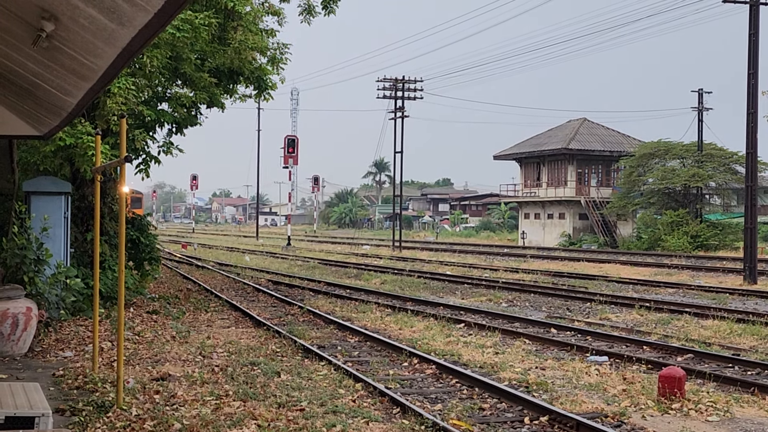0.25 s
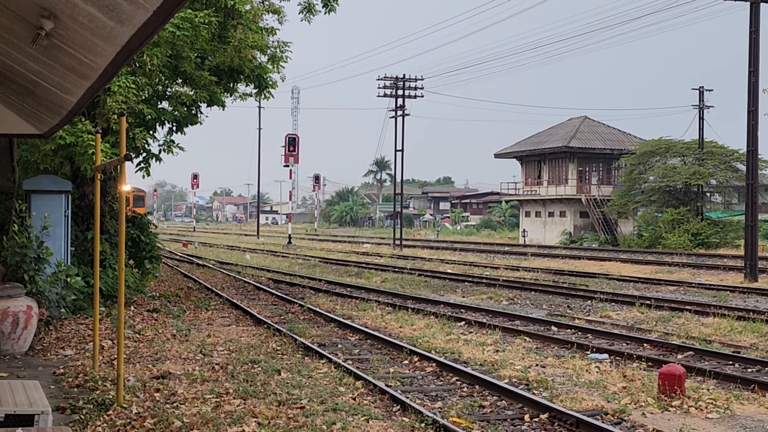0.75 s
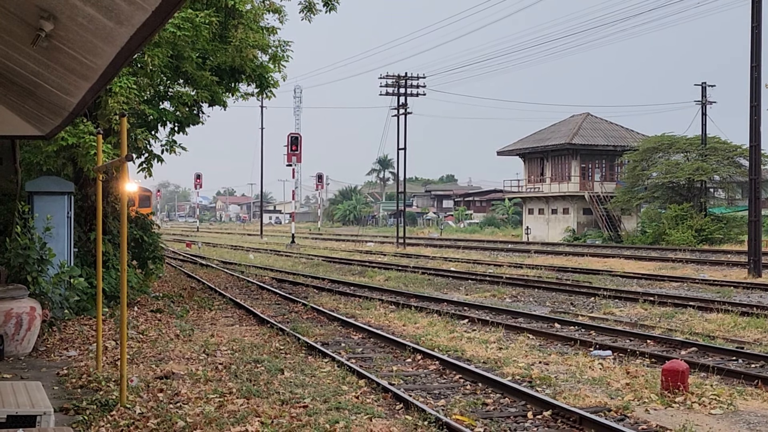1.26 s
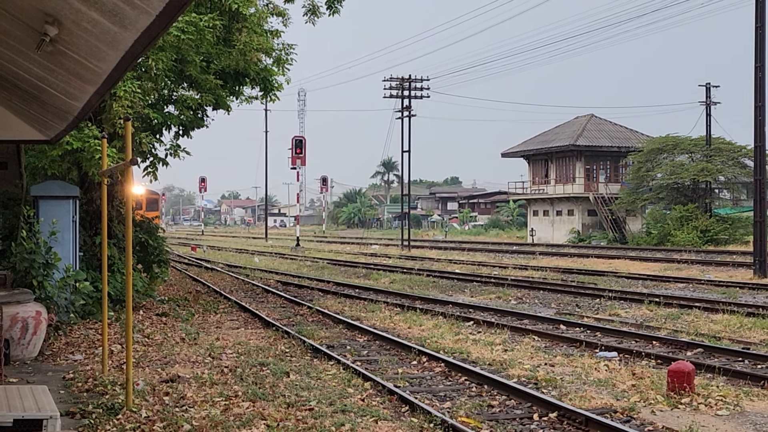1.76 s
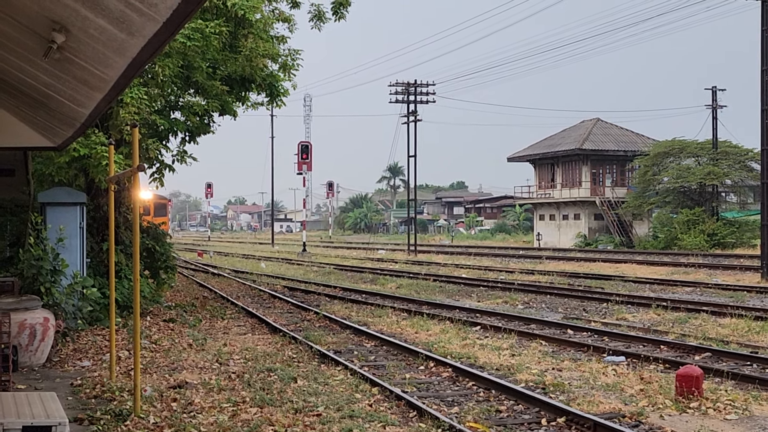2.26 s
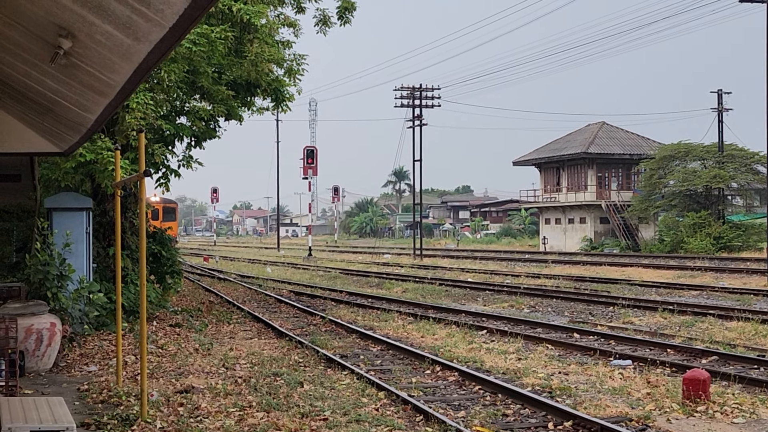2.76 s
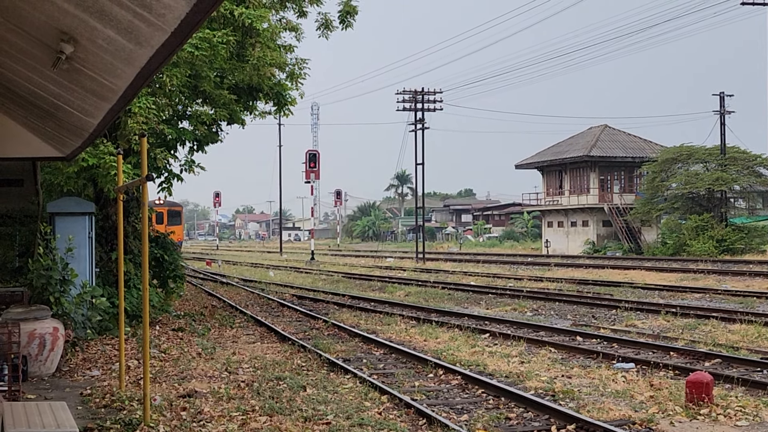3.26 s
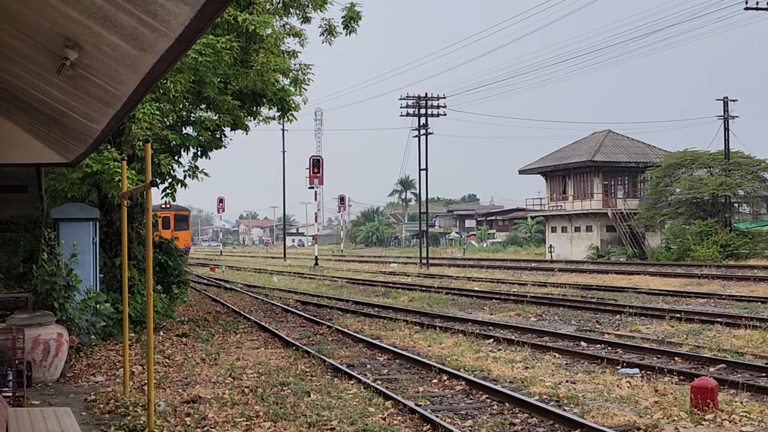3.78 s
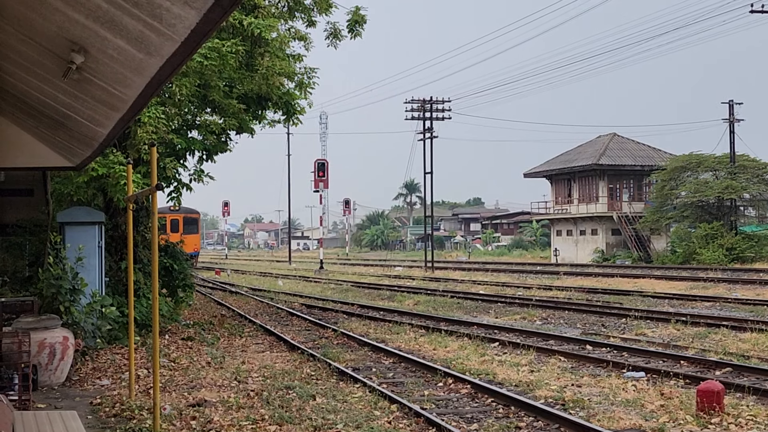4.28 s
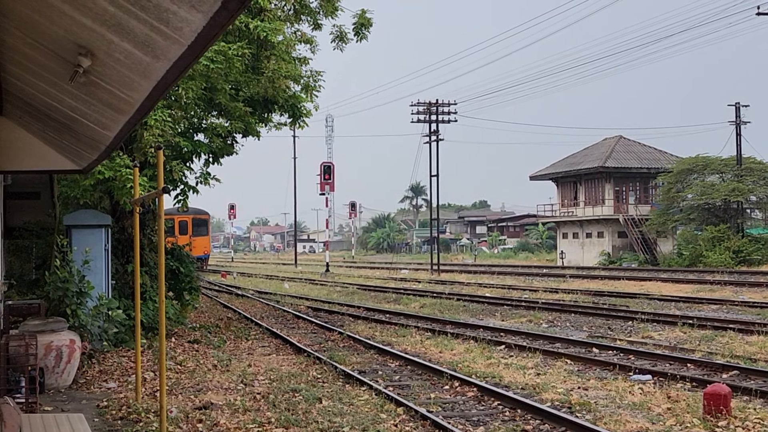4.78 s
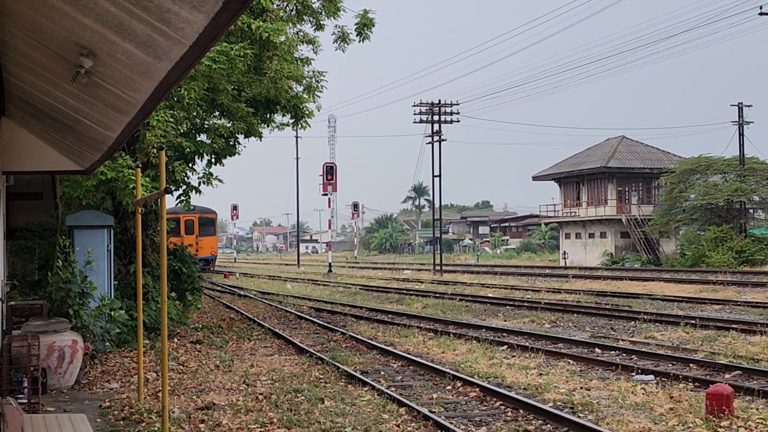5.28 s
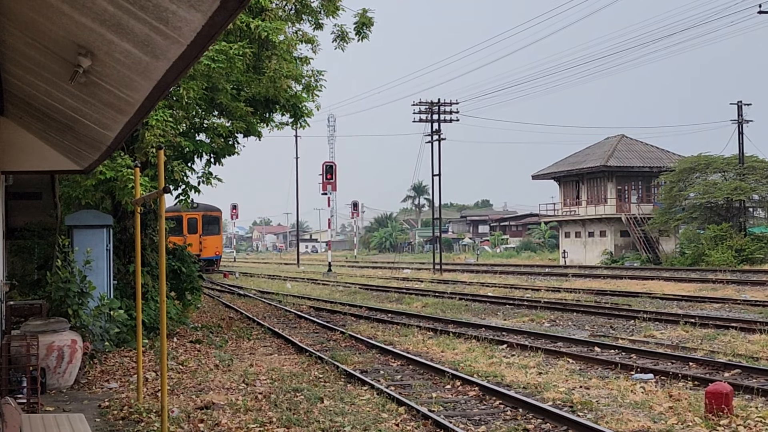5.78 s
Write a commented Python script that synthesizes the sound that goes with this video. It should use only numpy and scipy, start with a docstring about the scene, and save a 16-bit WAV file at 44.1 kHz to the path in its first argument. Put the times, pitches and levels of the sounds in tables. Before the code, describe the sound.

Outdoors at a country station, under the platform roof, a diesel railcar creeps nearer for six seconds. Its low drone, mostly 70 to 100 Hz, dominates: one engine idles evenly while another hunts, beating against it. The hunting engine is strong at 0 to 0.7 s, sags in pitch and level until about 2.8, surges to a peak near 3.6, then eases after 4.5. Soft exhaust puffs and light metallic clatter follow it, the puffs growing slightly. A wheel sings very faintly at 0.7 and 4.25. Close by, ticks and squeaky rubs come at 0.4 to 0.9; dry leaves scuff sharply at 1.4, 2.05, 3.5 and 4.4. Small bird chirps cluster between 1.8 and 2.7, with faint ones later and a clearer one at 6.0. Around 5.8 to 5.95 a flurry of scuffs and ticks covers a soft low thud. Quiet, dark yard air remains underneath.

```python
"""A country station, under the platform roof: a diesel railcar creeps nearer and its exhaust puffs grow.
One engine idles evenly, a second surges and sags; their drones, sums of cycle harmonics, beat together.
Resonators shape the puffs, injector clatter and a faintly singing wheel, all driven by noise or pulses.
Close by, flickering noise makes scuffed dry leaves, rubs and a thud; gliding sines make bird chirps,
and decaying sines make ticks. Filtered noise gives the still air of the yard."""
import sys
import numpy as np
from scipy import signal
from scipy.fft import rfft, irfft
from scipy.io import wavfile

SR = 44100
rng = np.random.default_rng(int(sys.argv[2]) if len(sys.argv) > 2 else 0)


def generate_wav(signal):
    """Clip the signal to [-1, 1] and save it as 16-bit WAV at the path in sys.argv[1]."""
    frames = np.transpose(np.atleast_2d(signal))
    scaled = np.clip(frames, -1, 1) * 32767
    pcm = np.round(scaled).astype(np.int16)
    wavfile.write(sys.argv[1], SR, pcm)


N = 266364
T = np.arange(N) / SR  # s
FREQ = np.maximum(np.fft.rfftfreq(N, 1 / SR), 1)  # Hz


def undb(db):
    """Level definition: decibels to amplitude gain."""
    return 10 ** (np.asarray(db) / 20)


def unit(x):
    """Normalisation: scale to rms 1."""
    return x / np.sqrt(np.mean(x ** 2))


def columns(rows):
    """Logarithmic interpolation: spread each column of a (frequency [Hz], ..) table over FREQ."""
    hz, *rest = np.transpose(rows)
    return [np.interp(np.log(FREQ), np.log(hz), column) for column in rest]


def colour(x, gain):
    """Linear filtering: multiply the spectrum by a gain for each frequency."""
    return irfft(rfft(x) * gain, N)


def resonance(hz, width):
    """Damped resonance: the complex response of one mode, with its half-power bandwidth in Hz."""
    return 1 / (1 + 1j * (FREQ / hz - hz / FREQ) * hz / width)


def noise():
    """Incoherence: two unrelated white noises."""
    return rng.standard_normal((2, N))


def walk(rate):
    """Random modulation: interpolated chance values of spread about 1, `rate` new ones per second."""
    steps = rng.standard_normal(4000)
    return 1.2 * np.interp(T * rate, np.arange(len(steps)), steps)


def swell(s, width):
    """Gaussian envelope: a smooth bell of height 1 around time s."""
    return np.exp(-.5 * ((T - s) / width) ** 2)


def stroke(s, rise, decay):
    """Exponential growth and decay: a rise to 1 at time s, then a fall."""
    return np.exp(-np.maximum((s - T) / rise, (T - s) / decay).clip(max=20))


def snaps(rate):
    """Poisson-like impulses: sparse clicks of uneven size at random moments, on both channels."""
    happens = rng.random(N) < rate / SR
    size = undb(SNAP_SCATTER_DB * rng.standard_normal(N))
    return unit(happens * np.sign(noise()) * size)


def outdoors(x, wet_db, decay):
    """Diffuse reverberation: a short tail from roof and trees, different on each side."""
    tail = noise()[:, :SR] * np.exp(-T[:SR] / decay)
    tail /= np.sqrt(np.sum(tail ** 2) / 2)
    return x + undb(wet_db) * signal.fftconvolve(x[None], tail, axes=1)[:, :N]


def place(pair, image, lead_s):
    """Stereo coherence: the first sound is common to both channels, the second opposite in sign."""
    pan_db, likeness = columns(image)
    likeness = np.clip(likeness, 0, 1)
    common, opposite = rfft(pair) * np.sqrt([1 + likeness, 1 - likeness])
    left = (common + opposite) * undb(pan_db / 2)
    right = (common - opposite) * undb(-pan_db / 2)
    left = left * np.exp(2j * np.pi * FREQ * lead_s)
    total = np.sqrt(undb(pan_db) + undb(-pan_db))
    return irfft(np.array([left, right]) / total, N)


# stereo image of the train: (frequency [Hz], left minus right [dB], likeness of the channels [0-1])
TRAIN_IMAGE = [(30, 0, .94), (70, -.2, .995), (160, 0, .999), (370, .7, .9), (650, 0, .56), (1400, -6, .46),
               (4600, -7, .15), (6200, -4.5, .05), (7500, 2.5, 0)]
# stereo image of the train: (frequency [Hz], lead of the left channel, negative when later [s])
TRAIN_LEAD = [(100, -.00023), (400, -.0001), (650, -.00025), (1030, -.00041), (1460, -.0003),
              (2330, -.00023), (6100, -.0002)]


def place_train(pair):
    """Stereo image: level difference, delay and coherence of the channels by frequency."""
    return place(pair, TRAIN_IMAGE, columns(TRAIN_LEAD)[0])


# stereo image of the nearby sounds: (frequency [Hz], left minus right [dB], likeness of the channels [0-1])
NEAR_IMAGE = [(130, 0, .99), (400, 0, .88), (1200, -1, .15), (3500, -7, .35), (6200, -3.5, .45),
              (7600, 2.5, .3), (12000, 3.5, .05)]
NEAR_LEAD_S = .000135  # lead of the left channel


def place_near(pair):
    """Stereo image: level difference and coherence by frequency, with one delay between the channels."""
    return place(pair, NEAR_IMAGE, NEAR_LEAD_S)


# spectrum of the still air: (frequency [Hz], relative density [dB per Hz])
YARD = [(20, 7), (38, 16.5), (60, 16.5), (110, 9), (160, 3.5), (300, -10.5), (430, -7.5), (800, -5),
        (2000, -14.5), (5000, -31), (8000, -40), (11000, -48.5), (15500, -51.5)]


def yard():
    """Broadband background noise: distant town and foliage, swelling gently."""
    air = unit(colour(noise(), undb(columns(YARD)[0])))
    return undb(-38.0 + 0.23 * walk(0.94)) * place_train(air)


# bird chirps: (start [s], length [s], start pitch [Hz], middle pitch [Hz], end pitch [Hz],
# level [dB], roughness [0-1])
CHIRPS = [(1.151, .078, 2920, 3200, 3280, -50, .75), (1.816, .031, 4100, 4260, 4100, -47, .05),
          (1.935, .045, 3590, 3490, 3500, -48, .1), (1.98, .075, 4400, 4860, 4950, -46, .4),
          (2.125, .024, 3850, 3970, 3930, -48, .1), (2.177, .08, 2950, 3040, 3220, -51, .15),
          (2.245, .055, 3230, 3320, 3480, -46, .15), (2.29, .032, 3450, 3420, 3200, -48.5, .2),
          (2.34, .07, 2974, 3090, 3150, -53, .1), (2.508, .06, 4230, 4130, 3850, -47, .9),
          (2.528, .047, 3950, 3620, 3100, -45.5, .7), (2.647, .06, 3850, 3600, 3100, -44.5, .45),
          (3.082, .05, 3000, 2830, 2600, -51.5, .3), (3.696, .09, 3350, 3230, 3040, -53, .7),
          (4.169, .099, 3480, 3360, 3190, -52.5, .8), (4.637, .06, 3610, 3520, 3330, -52.5, .3),
          (5.156, .12, 3600, 3520, 3300, -52.5, 1), (6.012, .08, 4400, 4730, 4850, -42, .4)]
CHIRP_FLUTTER = 0.024  # pitch flutter at roughness 1, as a share of the pitch
WALL_ECHO_S, WALL_ECHO_DB = 0.021, -8.5


def birds():
    """Frequency modulation: whistles arch through three pitches; rough ones flutter; a wall echoes them."""
    out, flutter = np.zeros(N), CHIRP_FLUTTER * walk(300)
    for s, length, start, middle, end, db, rough in CHIRPS:
        on = (T >= s) & (T < s + length)
        u = (T[on] - s) / length
        arch = np.abs(np.sin(np.pi * u))
        hz = start + (end - start) * u + (middle - (start + end) / 2) * arch
        hz = hz * (1 + rough * flutter[on])
        out[on] += undb(db) * np.sqrt(arch) * np.sin(2 * np.pi * np.cumsum(hz) / SR)
    out += undb(WALL_ECHO_DB) * np.interp(T - WALL_ECHO_S, T, out)
    # much of it comes by way of roof and trees
    return outdoors(out * undb(1.5 * walk(70)), wet_db=-4, decay=0.055)


# small hard contacts: (time [s], frequency [Hz], level [dB], decay [s])
TICKS = [(.434, 3480, -34.5, .004), (.49, 13100, -32, .0001), (.566, 3380, -29, .0027),
         (.566, 950, -26.5, .0015), (.568, 12500, -41, .0002), (.579, 11600, -45, .0004),
         (4.589, 2250, -36, .0019), (4.941, 13000, -46, .00022), (5.876, 1950, -32, .003),
         (5.909, 3940, -31, .0023)]


def ticks():
    """Damped free vibration: tiny hard contacts ring briefly."""
    out = 0
    for s, hz, db, decay in TICKS:
        age = np.maximum(T - s, 0)
        ring = np.exp(-np.minimum(age / decay, 20)) * np.sin(2 * np.pi * hz * age)
        out = out + undb(db) * ring
    return outdoors(out, wet_db=-5.5, decay=0.014)


# faint squeaky rubs: (time of the peak [s], width [s], level [dB])
RUB = [(.48, .035, -49), (.59, 0.013, -48), (.75, 0.061, -46), (.87, .045, -48)]
# what the rubbing rings with: (frequency [Hz], bandwidth of one pass [Hz], level [dB])
RUB_MODES = [(3560, 420, 3.5), (4570, 910, -7), (7400, 550, -18), (11500, 3500, -28)]
SLIPS_PER_S = 450


def rub():
    """Stick-slip excitation: uneven slips and noise ring one squeaky band, with a little hiss above it."""
    power = sum(undb(2 * db) * np.abs(resonance(hz, width)) ** 4 for hz, width, db in RUB_MODES)
    pressure = sum(undb(db) * swell(s, width) for s, width, db in RUB)
    pressure = pressure * undb(1.6 * walk(120))
    squeak = unit(colour(snaps(SLIPS_PER_S) + noise(), np.sqrt(power)))
    return pressure * place_near(squeak)


BUMP_S, BUMP_RISE_S, BUMP_DECAY_S, BUMP_DB = 5.87, .05, .07, -21.5  # BUMP_S is the peak


def bump():
    """Low resonance driven by noise: a soft thud under the late scuffs."""
    thud = unit(colour(noise(), resonance(85, 49) ** 2))
    return undb(BUMP_DB) * stroke(BUMP_S, BUMP_RISE_S, BUMP_DECAY_S) * place_near(thud)


LEAF_GRAIN_DB, LEAF_GRAIN_PER_S = 1.5, 140  # flicker of each band: spread and rate


def grainy(x, count=7):
    """Independent band modulation: half-octave bands from 1 to 8 kHz flicker as single leaves give way."""
    band = np.clip(2 * np.log2(FREQ / 1000), 0, count - 1).round()  # the end bands take the rest
    return sum(colour(x, band == k) * undb(LEAF_GRAIN_DB * walk(LEAF_GRAIN_PER_S)) for k in range(count))


# leaf scuffs: (time of the peak [s], level [dB], rise [s], weight of the body below 2 kHz [dB])
SCUFFS = [(.44, -46, 0.0063, 5), (.5, -48, 0.014, 6), (.66, -50.5, .07, 17.5), (.84, -46.5, 0.035, 16.5),
          (1.16, -50, .0095, 2), (1.215, -44, .03, 12), (1.37, -35.5, 0.0067, 9), (1.59, -46, 0.082, 12),
          (1.748, -42, 0.0077, 8), (1.84, -48.5, .016, 13), (2.046, -39.5, .006, 9),
          (2.428, -41.5, 0.0043, -1), (2.99, -49.5, 0.026, 11), (3.485, -41.5, 0.014, 9),
          (3.7, -47.5, 0.064, 13), (4.389, -36.5, 0.014, 9.5), (4.772, -42, 0.017, 6.5),
          (5.61, -48, .011, 15), (5.815, -42, 0.025, 12.5), (5.833, -35.5, 0.01, 13),
          (5.878, -36, 0.016, -1), (5.908, -37.5, 0.0096, 5), (5.945, -45, .012, 8)]
# spectrum of the dry leaves: (frequency [Hz], relative density [dB per Hz])
LEAVES = [(200, -0.5), (800, -6.5), (2000, -1), (3500, 7.5), (4500, 1.5), (5800, 4.5), (7000, -7.5),
          (8500, -11), (10500, -23.5), (15000, -28)]
# a scuff dies quickly at first, then lingers in a weaker tail
SCUFF_DECAY_S, SCUFF_TAIL_S, SCUFF_TAIL_DB = 0.037, 0.1, -9
# the leaves spring back after each scuff with a thin hiss
SETTLE_LAG_S, SETTLE_RISE_S, SETTLE_DECAY_S, SETTLE_DB = 0.1, 0.033, 0.009, -12
# single leaves snap above the crush: scatter of snap size, and level against the crush
SNAPS_PER_S, SNAP_SCATTER_DB, SNAP_DB = 170, 2, -5.5


def scuffs():
    """Crackling noise: each scuff crushes many tiny cracks and sharper snaps, then the leaves spring back."""
    snapping = outdoors(snaps(SNAPS_PER_S)[0], wet_db=-8, decay=0.0023)
    crackle = noise() + undb(SNAP_DB) * snapping
    sound = unit(grainy(colour(crackle, undb(columns(LEAVES)[0]))))
    body = colour(sound, 1 / (1 + (FREQ / 2000) ** 4))
    high_power, body_power = 0, 0
    for s, db, rise, body_db in SCUFFS:
        tail = undb(SCUFF_TAIL_DB) * stroke(s, rise, SCUFF_TAIL_S)
        crush = undb(db) * np.hypot(stroke(s, rise, SCUFF_DECAY_S), tail)
        settle = undb(db + SETTLE_DB) * stroke(s + SETTLE_LAG_S, SETTLE_RISE_S, SETTLE_DECAY_S)
        high_power = high_power + crush ** 2 + settle ** 2
        body_power = body_power + (undb(body_db) * crush) ** 2
    return place_near(np.sqrt(high_power) * (sound - body) + np.sqrt(body_power) * body)


# a wheel sings on the curve: (time of the middle [s], half length [s], level [dB])
SING = [(.7, .32, -55), (4.252, .33, -50.5)]
SING_HZ, SING_WIDTH_HZ, SING_REST_DB = 1300, 23, -65  # width of one pass; level between songs


def wheel():
    """Lightly damped resonance: narrow-band noise at the wheel's mode rises and falls."""
    singing = undb(SING_REST_DB) + sum(undb(db) / (1 + ((T - s) / half) ** 8) for s, half, db in SING)
    return singing * unit(colour(noise(), resonance(SING_HZ, SING_WIDTH_HZ) ** 2))


# engine clatter and rolling: (frequency [Hz], relative density [dB per Hz])
CLATTER = [(400, 0), (560, -2.5), (680, 7), (1050, 0.5), (1350, 6), (1650, -0.5), (2000, 5), (2900, -1.5),
           (3500, -1), (4100, -6), (5500, -8.5), (6900, -16.5), (7500, -13), (10500, -27.5), (15000, -53)]
# ringing engine covers: (frequency [Hz], bandwidth [Hz], level relative to the clatter [dB])
COVERS = [(1200, 34, -13.5), (1500, 49, -3.5), (1952, 63, -5.5), (2560, 69, -11.5), (5300, 140, -5.5),
          (6153, 45, 2), (7400, 83, -9)]


def clatter(cycle, depth, ring_db, count=6):
    """Pulsed structural excitation: injector and valve noise at each firing rings covers and panels."""
    gate = 1 + depth * np.exp(-(cycle * count % 1) / 0.5)
    covers = 1 + sum(undb(db) * resonance(hz, width) for hz, width, db in COVERS)
    # the spectrum of a decaying noise stands for many lesser panel modes
    panel_power = np.abs(rfft(noise() * np.exp(-T / 0.04))) ** 2
    panels = 1 + undb(ring_db) * unit(panel_power)
    return unit(colour(noise() * gate, undb(columns(CLATTER)[0]) * covers * np.sqrt(panels)))


# pipe and underbody resonances: (frequency [Hz], bandwidth of one pass [Hz], level [dB])
PIPE = [(142, 42, -4), (168, 19, -2.5), (220.8, 35, 0.5), (293.9, 18.8, 0), (337.4, 12, -4.5),
        (364.3, 14.2, -4.5), (502, 41, -13), (616.5, 18, -10.5), (656, 24, -6.5), (780, 25, -10),
        (818, 10, -6.5)]


def chuff(cycle, scatter_db, gas_db, growl_db, count=6):
    """Impulse response of a pipe: each firing sends a puff; cylinders differ in strength and timing."""
    own = rng.standard_normal((count, 2))  # timing and strength of each cylinder
    firing = np.arange(int(cycle[0] * count) + 1, int(cycle[-1] * count))
    chance = rng.standard_normal((len(firing), 2))
    cylinder = own[firing % count]
    position = (firing + 0.201 * cylinder[:, 0] + 0.031 * chance[:, 0]) / count
    when = np.interp(position, cycle, np.arange(N))
    puffs = np.zeros(N)
    puffs[when.astype(int)] = undb(2 * cylinder[:, 1] + scatter_db * chance[:, 1])
    # the yard smears the puffs on their way; turbulent gas rushes along with them
    paths = noise() * np.exp(-T / 0.053)
    flow = unit(colour(puffs, rfft(paths))) + undb(gas_db) * noise()
    pipe = sum(undb(2 * db) * np.abs(resonance(hz, width)) ** 4 for hz, width, db in PIPE)
    # a broad growl fills the gaps between the resonances
    growl = undb(2 * growl_db) * np.abs(resonance(160, 170)) ** 4
    return unit(colour(flow, np.sqrt(pipe + growl)))


# fuel surges of the hunting engine: (time of the peak [s], width [s])
SURGES = [(.2, .4), (3.6, .45)]
# speed of the hunting engine: (time [s], four-stroke cycle rate [cycles per s])
SPEED = [(0.0, 5.79), (0.35, 6.092), (0.65, 6.237), (1.1, 6.152), (2.0, 5.753), (2.6, 5.502), (3.0, 5.391),
         (3.3, 5.578), (3.7, 5.947), (4.1, 6.216), (4.55, 6.145), (5.2, 5.867), (6.04, 5.548)]


def governor():
    """Hunting of a speed regulator: fuel (0-1) as bells in time, speed interpolated from its table."""
    fuel = sum(swell(s, width) for s, width in SURGES)
    return fuel, np.interp(T, *np.transpose(SPEED))


# exhaust drone before the engine gains: (multiple of the cycle rate [1], hunting engine on full fuel [dB],
# hunting engine coasting [dB], idling engine [dB])
DRONE = [(7, -47, -56, -55), (8, -43, -60, -53), (9, -35, -53, -55), (11, -35, -39, -46),
         (12, -38, -49, -53), (13, -18.5, -37, -29.5), (14, -27, -38, -48), (15, -29, -49, -34),
         (16, -23, -39, -38.5), (17, -42, -57, -52), (18, -30, -51, -44), (20, -39, -46, -44),
         (21, -41, -60, -60), (23, -47, -60, -57)]
# each line wanders in level, and the cycle by this share of a turn
CYCLE_JITTER, WAVER_DB = .0012, 1.0


def drone(cycle, levels, spread):
    """Fourier synthesis: unequal cylinders repeat every cycle, giving close low lines that throb."""
    turn = cycle + CYCLE_JITTER * walk(11.0)
    out = 0
    for (order, *_), db in zip(DRONE, levels):
        k = round(order)
        # the silencer holds back each line by its own time, so the throb is spread over the cycle
        phase = 2 * np.pi * (k * turn - spread * k ** 2)
        out = out + undb(db + WAVER_DB * walk(4.8)) * np.sin(phase)
    return np.sqrt(2) * out


# silencer resonances crossed by the drone lines: (frequency [Hz], half width [Hz], boost [dB])
BOOMS = [(64.3, 0.51, -3), (68.4, 1.5, 3), (99, 0.47, 4.5)]
# share of fuel that only keeps the engine turning, and how the drone answers to the rest
FUEL_SLACK, EFFORT_POWER = .12, .8


def hunting_levels(fuel, speed):
    """Resonance: each line (dB) grows with fuel and is boosted or cut crossing a silencer resonance."""
    effort = np.clip((fuel - FUEL_SLACK) / (1 - FUEL_SLACK), 0, 1) ** EFFORT_POWER
    levels = []
    for k, full, coast, _ in DRONE:
        boom = sum(db / (1 + ((k * speed - hz) / width) ** 2) for hz, width, db in BOOMS)
        levels.append(coast + (full - coast) * effort + boom)
    return levels


IDLE_HZ = 6.0813  # four-stroke cycles per second of the idling engine
HUNTING_START, IDLING_START = .271, .331  # share of its cycle that each engine has run at the start
HUNTING_SPREAD, IDLING_SPREAD = .0257, .1884  # how widely each silencer spreads the throb
HUNTING_DB, IDLING_DB = 0.5, 0.5  # gain on each engine's drone
PUFF_FULL_DB, PUFF_COAST_DB = -37, -48.5  # hunting engine, before the approach gain
APPROACH_DB_PER_S = 0.26  # the puffs grow as the train draws nearer
# clatter when coasting at the idling speed, its rise on full fuel and with each Hz of cycle rate
CLATTER_DB, CLATTER_SURGE_DB, CLATTER_DB_PER_HZ = -42.5, 2.5, 2


def railcar():
    """Superposition and beating: two engines and a wheel; fuel and speed steer the hunting engine."""
    fuel, speed = governor()
    hunting = HUNTING_START + np.cumsum(speed) / SR  # in cycles
    idling = IDLING_START + IDLE_HZ * T
    hum = undb(HUNTING_DB) * drone(hunting, hunting_levels(fuel, speed), HUNTING_SPREAD)
    hum += undb(IDLING_DB) * drone(idling, [row[3] for row in DRONE], IDLING_SPREAD)

    puff_gain = np.hypot(undb(PUFF_COAST_DB), undb(PUFF_FULL_DB) * fuel)
    puffs = puff_gain * chuff(hunting, scatter_db=-3.0, gas_db=3.0, growl_db=-2.0)
    puffs += undb(-44.0) * chuff(idling, scatter_db=0.5, gas_db=-2.5, growl_db=-29.0)
    puffs *= undb(APPROACH_DB_PER_S * (T - T.mean()))

    rattle_db = CLATTER_DB + CLATTER_SURGE_DB * fuel + CLATTER_DB_PER_HZ * (speed - IDLE_HZ)
    rattle = undb(rattle_db) * clatter(hunting, depth=0.28, ring_db=4)
    # the drone is wholly common to both channels
    hum_pair = np.array([hum, np.zeros(N)])
    return place_train(hum_pair + puffs + rattle + wheel())


def scene():
    """Superposition: yard, the small sounds near the platform, and the train."""
    return yard() + birds() + ticks() + rub() + bump() + scuffs() + railcar()


TOP_HZ = 15700


def record(dry):
    """Low-pass filtering: a steep elliptic filter cuts the top."""
    return signal.sosfilt(signal.ellip(8, .2, 70, TOP_HZ, fs=SR, output="sos"), dry)


dry = scene()
out = record(dry)
generate_wav(out)
```